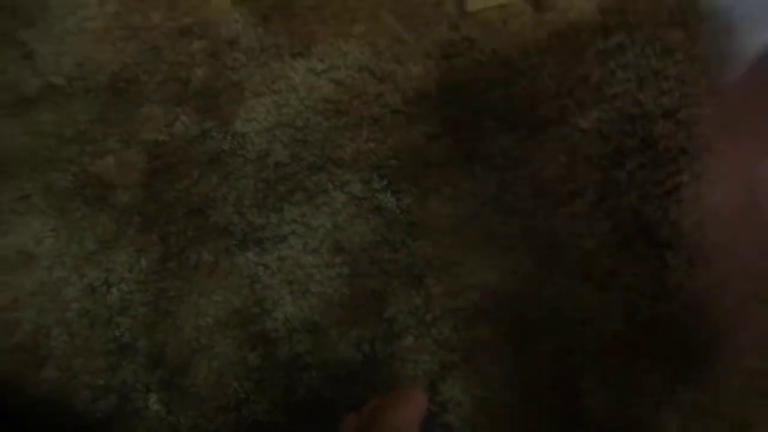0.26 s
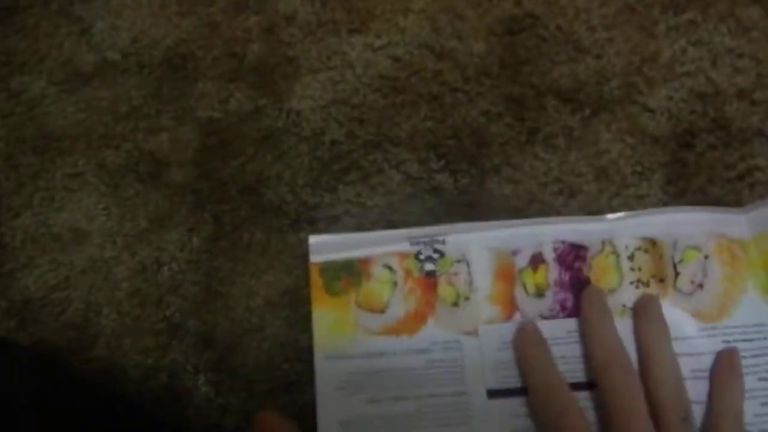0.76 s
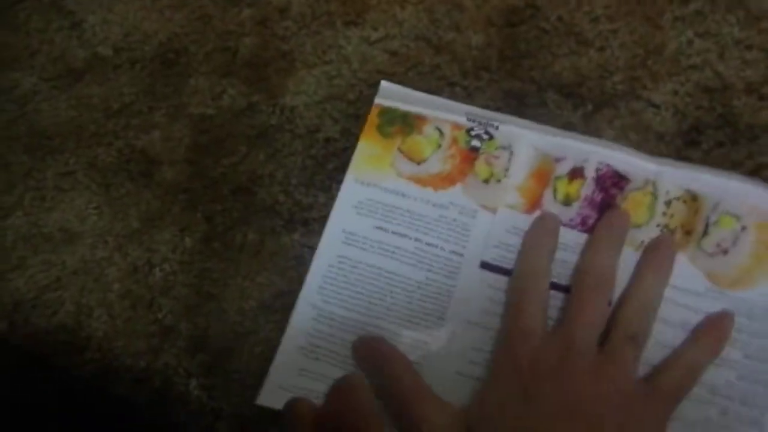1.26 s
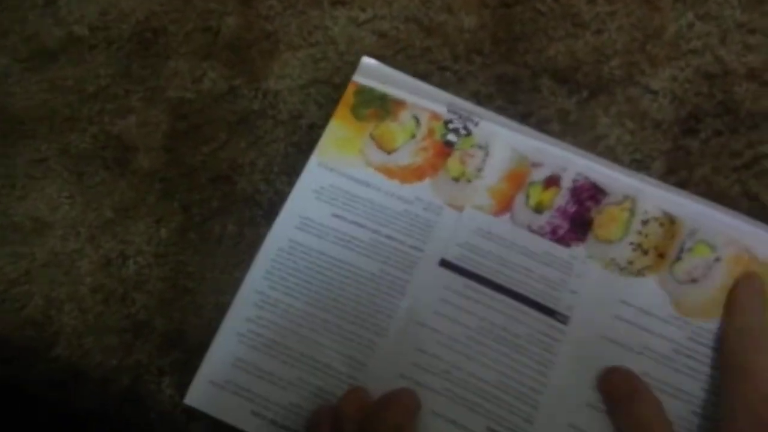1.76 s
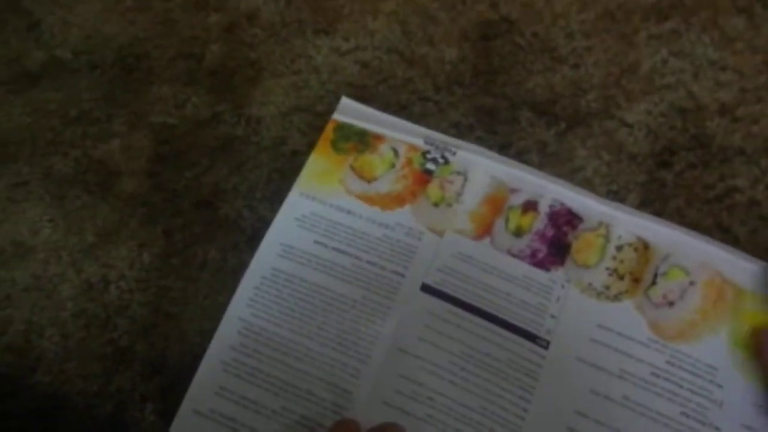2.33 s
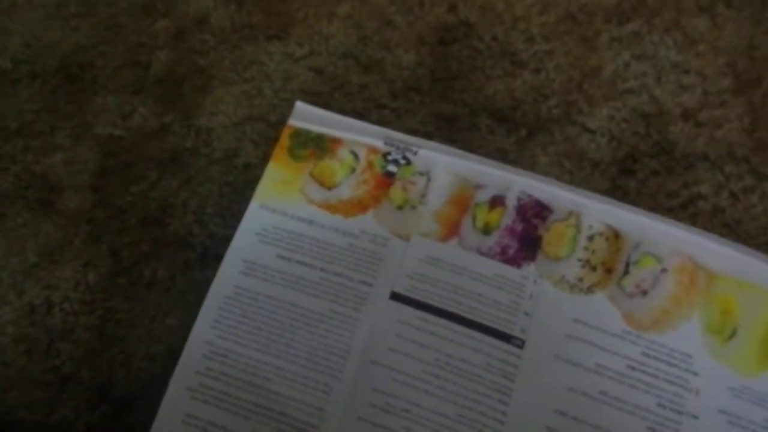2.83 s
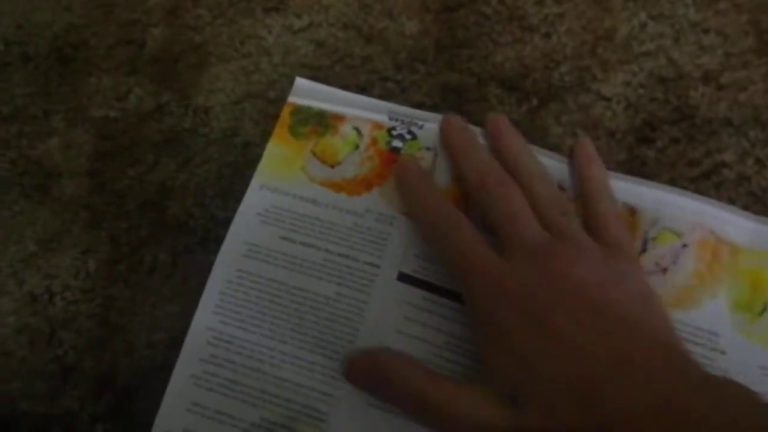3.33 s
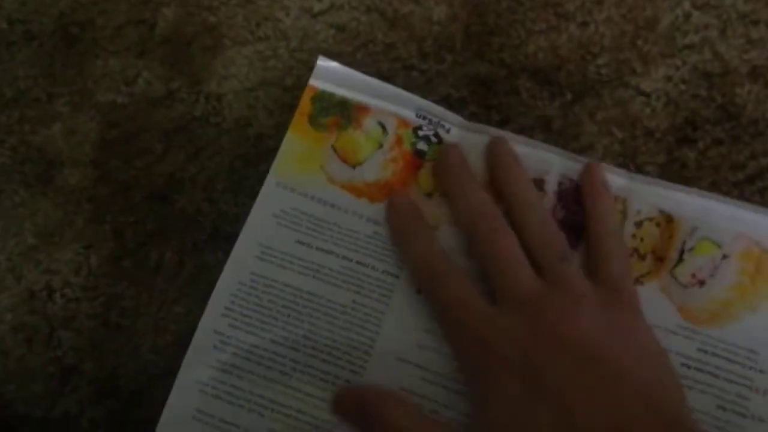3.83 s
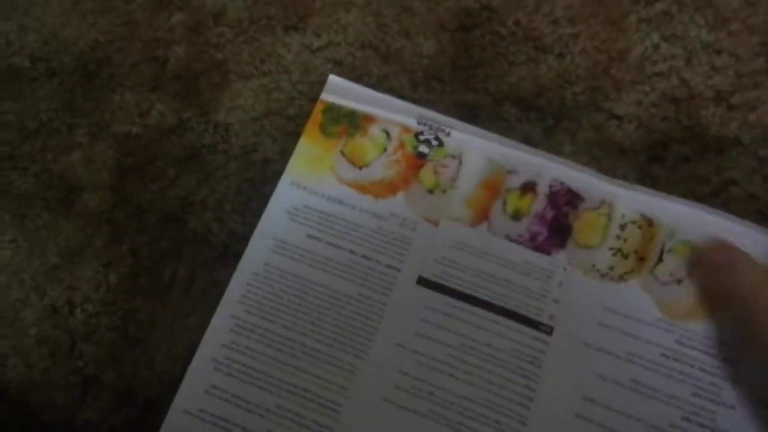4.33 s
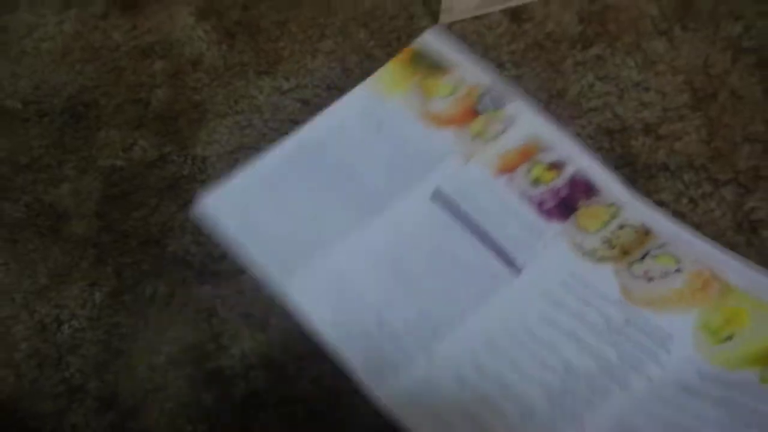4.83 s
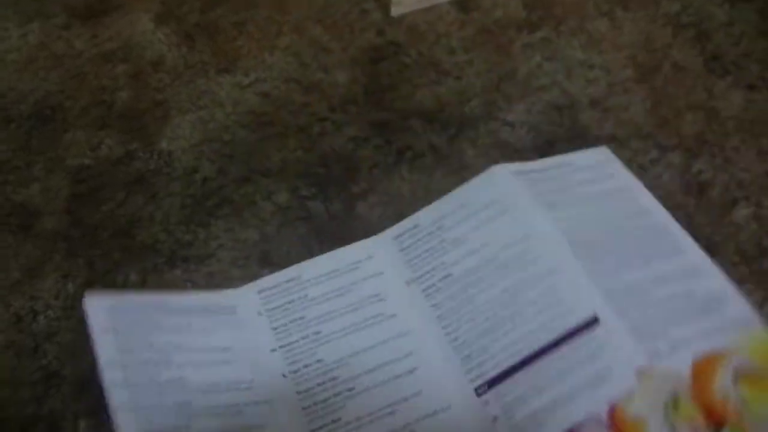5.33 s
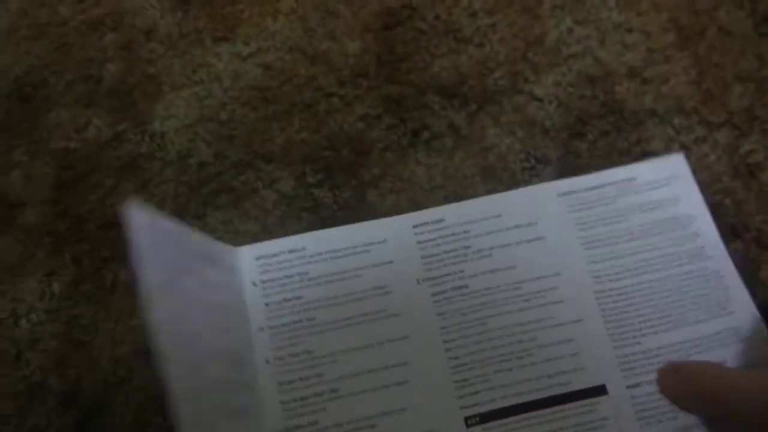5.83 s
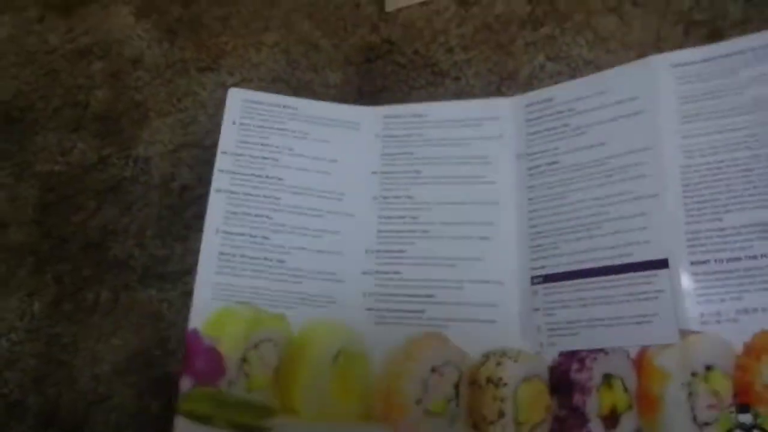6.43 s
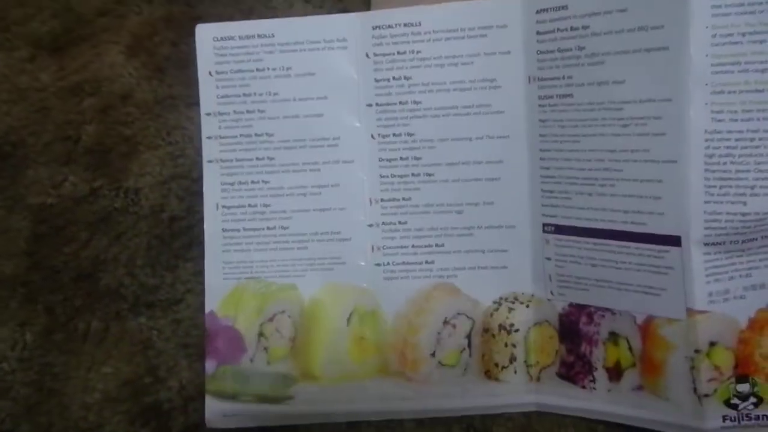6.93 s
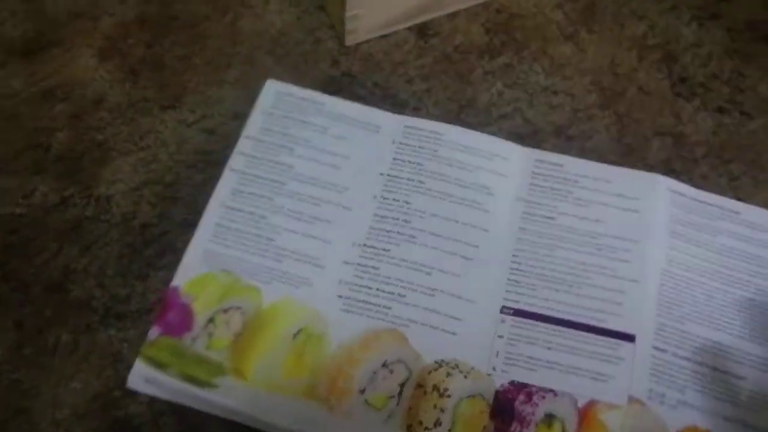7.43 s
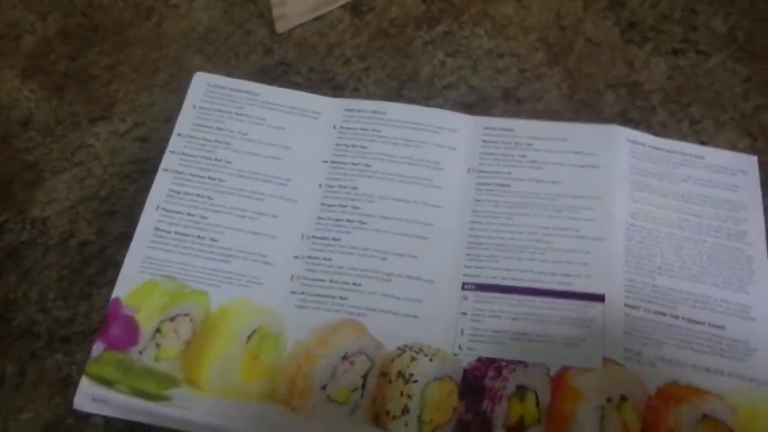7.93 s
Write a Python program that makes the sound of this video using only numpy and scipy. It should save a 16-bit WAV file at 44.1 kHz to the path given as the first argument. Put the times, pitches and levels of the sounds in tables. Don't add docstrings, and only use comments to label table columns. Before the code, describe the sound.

In a quiet, carpeted room with a faint low hum, a folded paper leaflet lands at once with a soft thud and dull, strong snaps. A brief lull holds faint rustle until 0.4 s, then panels flap and crinkle, with a heavy snap at 0.7 s. From 0.8 to 1.4 s a hand drags the sheet in a broad hissing crackle. Softer sliding follows, with sharp cracks near 2.1 s and a dense crackling cluster at 2.4-3.0 s. After a pause, creases snap at 3.4-3.8 s with a low soft thud, then a smooth slide around 3.9 s. Crisp crackling returns at 4.5-4.9 s, flapping and scraping at 5.2-5.7 s, and bright pops and hollow puffs at 5.9-6.3 s. A last snap comes at 6.6 s; weak rustles around 7.2 s and tiny left-leaning plastic ticks trail into hum by 8 s. Close stereo, short dry echoes.

```python
import sys
import numpy as np
from scipy import signal
from scipy.fft import rfft, irfft, next_fast_len
from scipy.io import wavfile
from scipy.ndimage import uniform_filter1d, map_coordinates

SR = 44100
rng = np.random.default_rng(int(sys.argv[2]) if len(sys.argv) > 2 else 0)


def boost(x):
    u = np.asarray(x, float) / 20
    return 10 ** u


def generate_wav(signal):
    frames = np.transpose(np.atleast_2d(signal))
    scaled = np.clip(frames, -1, 1) * 32767
    pcm = np.round(scaled).astype(np.int16)
    wavfile.write(sys.argv[1], SR, pcm)


N = 360297


def unit(x):
    return x / np.sqrt(np.mean(x ** 2) + 1e-20)


def along(points, hz):
    f, v = np.transpose(points)
    return np.interp(np.log(hz + 1), np.log(f + 1), v)


def wobble(rate_hz):
    knots = rng.standard_normal(int(N * rate_hz / SR) + 4)
    return map_coordinates(knots, [np.arange(N) * rate_hz / SR])


def coloured(x, points):
    m = next_fast_len(N + 8192)
    gain = boost(along(points, np.fft.rfftfreq(m, 1 / SR)))
    return irfft(rfft(x, m) * gain, m)[..., :N]


def ring(hz, t60, rise, t):
    return np.sin(2 * np.pi * hz * t) * boost(-60 * t / t60) * (1 - np.exp(-t / rise))


def place(out, start_s, sound):
    start = round(start_s * SR)
    out[..., start:start + sound.shape[-1]] += sound


def rustle(spectrum, side, lumps_db, patchy_db):
    noise = rng.standard_normal((2, N)) * boost(lumps_db)
    z = signal.stft(noise, nperseg=256)[2]
    field = uniform_filter1d(rng.standard_normal(z.shape[1:]), size=6, axis=0)
    field = uniform_filter1d(field, size=9, axis=1)
    patched = signal.istft(z * boost(patchy_db * unit(field)), nperseg=256)[1][:, :N]
    mid, other = coloured(patched, spectrum)
    other = coloured(other, side)
    return unit(np.array([mid + other, mid - other]))


def strokes(rows):
    t, power = np.arange(N) / SR, np.zeros(N)
    for s, db, rise, fall, *hold in rows:
        rising_db = 20 * np.maximum((s - t) / rise, 0)
        falling_db = 20 * np.maximum((t - s - sum(hold)) / fall, 0)
        power += boost(2 * (db - rising_db - falling_db))
    return power


# (rise, fall: 20 dB)
SLIDES = [(.46, -45.5, .04, 0.04, 0.092), (.645, -50, 0.028, .1, 0.077), (.8, -36, 0.078, 0.37, 0.2),
          (1.17, -38.5, 0.18, 0.1, .22), (1.47, -57.5, 0.055, 0.042, 0.091),
          (1.68, -51.5, 0.061, 0.17, 0.12), (1.88, -43.5, 0.43, 0.3, 0.24), (2.49, -43, 0.025, 0.089, 0.26),
          (3.35, -50.5, 0.02, 0.175, 0.04), (3.46, -43, 0.059, 0.057, 0.11),
          (3.9, -39.5, 0.17, 0.21, 0.032), (4.3, -57, 0.03, 0.24, 0.11), (4.6, -46.5, 0.16, .07, 0.1),
          (5.41, -56.5, 0.42, .1, 0.16), (5.96, -52.5, 0.12, .1, 0.11), (6.33, -50.5, 0.037, .1, 0.13),
          (6.487, -50.5, 0.22, 0.13, 0.098), (7.089, -53, 0.098, 0.18, 0.097), (7.28, -59, .02, 0.16, 0.16)]
# peak_s, level_db, rise_s, fall_s
BRUSHES = [(.01, -53.5, 0.025, 0.079), (.114, -63.5, 0.12, 0.24), (.275, -59.5, 0.059, 0.16),
           (.515, -58, 0.063, .07), (.708, -45, 0.087, 0.12), (2.355, -50, 0.067, 0.11),
           (2.604, -34.5, 0.08, 0.043), (2.88, -43.5, 0.033, 0.062), (2.961, -35.5, 0.032, 0.045),
           (3.64, -44, 0.091, 0.035), (3.79, -45, 0.037, 0.25), (4.1, -51, 0.55, 0.064),
           (4.5, -55, 0.25, .1), (4.88, -50.5, 0.098, 0.039), (5.06, -54.5, 0.53, 0.34),
           (5.228, -52, 0.049, .07), (5.29, -36.5, 0.045, 0.024), (5.572, -44.5, 0.028, 0.29),
           (5.835, -43, 0.1, 0.098), (6.175, -39.5, 0.091, 0.048), (6.292, -43.5, 0.056, 0.03),
           (6.75, -63.5, 0.22, 0.35), (7.75, -69.5, 0.52, 0.84), (8.1, -66, 0.12, .5)]
# peak_s, level_db, rise_s, fall_s
CRUMPLES = [(.072, -39, 0.077, 0.076), (.275, -61, 0.11, .14), (.465, -32.5, 0.035, 0.18),
            (.708, -25, 0.039, 0.066), (.912, -27.5, 0.24, 0.13), (1.53, -42.5, 0.14, 0.077),
            (1.732, -38, 0.099, 0.15), (2.073, -32, 0.12, 0.1), (2.352, -24, 0.02, 0.016),
            (2.55, -30.5, 0.082, 0.23), (2.77, -35, 0.25, 0.061), (2.922, -28, 0.085, 0.043),
            (3.35, -33.5, 0.0072, 0.69), (3.55, -33, 0.21, 0.13), (4.4, -49.5, 0.45, 0.46),
            (4.548, -32, 0.045, 0.056), (4.63, -27.5, 0.029, 0.11), (4.745, -29.5, 0.26, 0.13),
            (4.865, -41.5, .016, 0.19), (5.228, -32, 0.028, 0.18), (5.41, -42, 0.11, 0.089),
            (5.539, -59.5, .08, .3), (5.655, -37.5, 0.12, 0.07), (5.86, -49, 0.16, .3),
            (6.01, -29, 0.41, 0.22), (6.16, -28, 0.13, 0.033), (6.443, -34.5, 0.12, 0.062),
            (6.57, -36, 0.04, 0.22), (7.13, -39.5, 0.16, 0.36)]
# peak_s, level_db, rise_s, fall_s
FLEXES = [(.075, -30, 0.06, 0.11), (.385, -49.5, 0.3, 0.071), (.517, -27, 0.086, 0.07),
          (.68, -30.5, 0.058, 0.14), (.912, -39, 0.11, 0.17), (1.465, -49.5, .45, 0.061),
          (1.732, -37.5, 0.091, 0.13), (2.078, -34.5, 0.12, 0.17), (2.37, -41, 0.034, 0.029),
          (2.492, -30, 0.02, 0.078), (2.606, -33.5, 0.074, 0.14), (2.971, -34, 0.027, 0.039),
          (3.388, -34, 0.059, 0.064), (3.566, -45, 0.18, 0.06), (3.64, -31.5, 0.029, 0.026),
          (3.787, -29, 0.018, 0.071), (4.5, -42, 0.053, 0.15), (4.775, -30, 0.04, 0.086),
          (5.14, -43.5, 0.17, 0.051), (5.25, -34.5, 0.1, 0.13), (5.579, -39, 0.035, 0.078),
          (5.835, -45, 0.12, 0.18), (5.944, -32, 0.019, 0.061), (6.215, -34.5, 0.22, 0.11),
          (6.443, -44.5, 0.99, 0.084), (6.617, -37.5, 0.053, 0.081), (7.186, -52, 0.37, 0.08),
          (7.315, -51, 0.1, 0.072)]


def motion():
    rest_db = -80
    drag = strokes(SLIDES + BRUSHES) + boost(2 * rest_db)
    wrinkle = strokes(CRUMPLES)
    bend = strokes(FLEXES)
    flap = bend + boost(2 * -17) * drag
    crinkle = wrinkle + boost(2 * 7) * drag + boost(2 * -14) * bend
    hiss = drag + boost(2 * -21.5) * wrinkle
    return 10 * np.log10(np.array([flap, crinkle, hiss]) + 1e-9)


# freq_hz, density_db (per Hz)
FLAP = [(29, -44), (50, -10.5), (160, -5.5), (260, -10.5), (371, 2), (495, -3), (600, -3.5), (900, -6.5),
        (1900, -16), (3500, -52)]
# freq_hz, density_db (per Hz)
CRINKLE = [(350, -40), (700, -7.5), (1000, -3.5), (1450, -4.5), (2660, 0), (4500, -7), (6000, -17.5),
           (9000, -28)]
# freq_hz, density_db (per Hz)
HISS = [(2650, -7), (4500, -2), (7140, -4.5), (10400, -6.5), (15200, -13.5), (16000, -29)]
# freq_hz, side_minus_mid_db
NEAR_SIDE = [(60, -9), (400, -15.5), (1500, -20.5), (3500, -12.5), (7000, -5.5), (15000, -4.5)]


def sheet():
    flap_db, crinkle_db, hiss_db = motion()
    uneven = np.clip(-0.1 + (flap_db - hiss_db) / 18, 0.25, 1.3)
    clumps = uneven * 4 * np.tanh(0.33 * wobble(45) + 0.5 * wobble(110))
    slips = uneven * np.clip(wobble(330) - 1.3, 0, 1)
    flap_lumps = 0.59 * clumps + 3.2 * np.tanh(wobble(60)) + 5 * slips
    crinkle_lumps = 2.5 * clumps + 1.1 * wobble(160) + 9 * slips
    hiss_lumps = 1.3 * clumps + 0.54 * wobble(120) + 8 * slips
    flap = rustle(FLAP, NEAR_SIDE, flap_lumps, patchy_db=3.0)
    crinkle = rustle(CRINKLE, NEAR_SIDE, crinkle_lumps, patchy_db=2.0)
    hiss = rustle(HISS, NEAR_SIDE, hiss_lumps, patchy_db=1.4)
    return boost(flap_db + 1.5) * flap + boost(crinkle_db - 4.5) * crinkle + boost(hiss_db + 4) * hiss


# start_s, peak_db, pitch_hz, length_ms
BUCKLES = [(0.066, -6, 640, 2.1), (0.076, -25, 674, 7.1), (0.0814, -19, 720, 1.1),
           (0.0904, -15.5, 760, 6.2), (0.387, -24, 456, 3.3), (0.4956, -8, 870, 7.6),
           (0.5111, -11.5, 1070, 3.6), (0.5308, -21, 1020, 1.5), (0.6996, -17, 840, 4.6),
           (.7041, -1.1, 930, 2.1), (1.462, -26.5, 970, 5.4), (1.6775, -22.5, 800, 4.5),
           (1.6815, -22, 900, 4), (1.704, -25, 800, 8), (2.0379, -25, 1200, 1.1), (2.652, -23, 664, 2.3),
           (2.859, -27, 3450, 3.6), (3.373, -24, 1020, 5.5), (3.411, -18.5, 590, 2.6),
           (5.0683, -28, 680, 3.7), (5.5848, -26, 660, 2.4), (6.6141, -16, 820, 5.9),
           (7.1718, -25, 865, 1.7)]
# start_s, peak_db, pitch_hz, length_ms
SNAPS = [(0.0695, -2, 705, 0.77), (0.4637, -21.5, 895, 10), (0.5198, -7.5, 920, 6), (.6658, -16, 680, 5),
         (0.8926, -17, 956, 1.9), (.92, -12, 1980, 3), (1.4018, -5, 3700, 0.45), (1.7395, -19.5, 945, 4.9),
         (1.747, -19, 1430, .67), (2.112, -24, 850, 1.9), (2.2149, -15.5, 1120, 3),
         (2.486, -17.5, 1050, 1.6), (2.489, -10, 1100, 4), (2.6277, -13, 1250, .8),
         (2.965, -11.5, 2660, 2.4), (3.7782, -15, 1020, 6.4), (3.969, -23.5, 797, 4.5),
         (4.7093, -13.5, 1520, 2.4), (4.7707, -7, 1410, 3.1), (4.8, -12.5, 1490, 4.4),
         (4.804, -12.5, 850, 1.1), (5.272, -25, 2550, 14), (5.5743, -27, 1190, 2.4),
         (5.9325, -12, 1250, 1.2), (5.9475, -10.5, 2480, 3), (6.2024, -11.5, 713, 2.5),
         (6.6087, -17, 1300, 1.8)]
# start_s, peak_db,
# pitch_hz, length_ms
CRACKS = [(0.024, -23.5, 1000, 3.5), (0.3152, -33, 1210, 3.5), (0.657, -16.5, 980, 1.4),
          (1.795, -26, 1500, 20), (7.278, -36, 2300, 5), (2.137, -4.5, 1270, 2), (2.4787, -21.5, 1500, 4.9),
          (2.538, -21, 1710, 2.1), (2.591, -13, 780, 3.3), (2.6204, -10, 3100, 0.86),
          (2.892, -24, 2620, 26), (2.9735, -12.5, 2170, 0.87), (3.3937, -4.5, 885, 1.6),
          (3.6388, -5, 1360, 1.7), (3.6859, -21.5, 990, 1.4), (3.785, -9.5, 1020, 1.7),
          (3.9826, -24, 540, 3.8), (4.4865, -29, 1260, 1.6), (4.549, -27.5, 3480, 4.8),
          (4.5885, -19, 1960, 2.4), (4.7837, -6, 1770, 0.59), (5.236, -21.5, 1470, 6.4),
          (5.5676, -16, 1440, 2.2), (5.6578, -31, 3280, 8), (6.2857, -30, 890, 16), (6.988, -38, 440, 1.5),
          (8.062, -39.5, 930, 6.2)]
CRACK_DB = (-21.5, -6.5, 0.5)
# freq_hz, gain_db
EDGE = [(800, -90), (1700, -7.5), (3200, 3), (4600, -2), (6000, -9), (9000, -16.5), (15500, -30.5)]


def snaps():
    out, t = np.zeros((2, N + SR)), np.arange(-264, 1784) / SR
    f, after = np.fft.rfftfreq(len(t), 1 / SR), np.maximum(t, 0)
    kinds = zip((BUCKLES, SNAPS, CRACKS), CRACK_DB)
    creases = [(*row, crack_db) for kind, crack_db in kinds for row in kind]
    for s, db, hz, ms, crack_db in creases:
        fade_db = np.where(t < 0, -7 + 15 * t / (ms / 1000), -9 * t / (ms / 1000))
        slips = rng.standard_normal((2, len(t))) * boost(fade_db)
        slips += 5 / ms ** 0.62 * np.exp(-(14 * hz * t) ** 2)
        width = 1.02 * hz
        panel = (1j * f * width / (hz * hz - f * f + 1j * f * width)) ** 2
        edge = boost(along(EDGE, f * (1500 / hz) ** 0.18))
        side_edge = edge * boost(along(NEAR_SIDE, f))
        body, crack, stray = irfft(rfft(slips[[0, 0, 1]]) * [panel, edge, side_edge])
        body = body / np.abs(body).max()
        crack = boost(crack_db) * (crack + stray * [[1], [-1]]) / np.abs(crack).max()
        camera_ring_db = -8.5 - 0.2237 * (db + 19.5) - 5.5 * np.log2(hz / 1000)
        camera_ring = boost(camera_ring_db) * ring(400, 0.044, 0.0029, after)
        place(out, s + t[0], boost(db) * (body + camera_ring + crack))
    return out[:, :N]


# peak_s, peak_db, pitch_hz
POPS = [(0.0253, -23, 2540), (0.073, -19, 2400), (0.5954, -37, 860), (0.6018, -37, 1040), (0.661, -26, 800),
        (0.6665, -27, 2280), (0.7263, -21, 1400), (0.794, -33, 1290), (0.9469, -22, 710),
        (1.0656, -25, 3970), (1.215, -31, 940), (1.4094, -28, 830), (1.6619, -27.5, 2600),
        (1.726, -28, 2770), (1.747, -27, 1920), (1.7994, -26, 1300), (1.9593, -28.5, 810),
        (2.0611, -29, 2240), (2.082, -23, 800), (2.098, -22, 990), (2.1052, -27, 760), (2.1196, -33, 960),
        (2.2621, -32, 3060), (2.4854, -24, 2340), (2.5136, -31, 1010), (2.5909, -12, 3500),
        (2.6211, -20, 710), (2.6275, -13, 3280), (2.6494, -25, 1290), (2.871, -27, 1800),
        (2.8855, -32, 880), (2.9917, -28, 930), (3.3436, -35, 3190), (3.3675, -27, 920),
        (3.4118, -25, 1870), (3.4465, -25, 1120), (3.5876, -27, 970), (3.7789, -26, 3240),
        (3.837, -28, 750), (4.4864, -34, 2410), (4.5436, -27, 1700), (4.564, -34, 1110),
        (4.6169, -29, 1800), (4.8024, -14, 2570), (4.8579, -26, 4000), (5.2406, -23, 2900),
        (5.2454, -23, 1020), (5.2922, -21.5, 1390), (5.331, -25, 710), (5.739, -30, 2670),
        (5.845, -24, 3080), (5.9149, -29, 1010), (5.9466, -9.5, 1210), (6.2075, -25, 1250),
        (6.2416, -32, 2620), (6.339, -30, 710)]
# peak_s, peak_db, pitch_hz
CRACKLES = [(.4968, -19, 860), (.512, -22, 1060), (.5324, -18, 960), (.6206, -39, 900), (.7007, -19, 2830),
            (.7088, -29, 1840), (.9205, -19, 900), (.9253, -25, 710), (.9948, -27, 970), (1.7351, -19, 900),
            (1.7325, -25, 900), (1.669, -30, 700), (2.862, -31, 980), (3.5128, -27.5, 960),
            (3.6279, -35, 1000), (3.7712, -31, 2110), (4.5453, -25, 4300), (4.6194, -27, 2290),
            (4.6763, -27, 3010), (4.7172, -27, 2730), (4.7746, -13, 980), (4.7802, -15, 870),
            (5.2794, -24, 840), (5.7389, -37, 710), (6.0498, -26, 2170), (6.1992, -28, 4300),
            (6.2035, -18.5, 1800), (6.224, -26, 600), (6.6098, -14.5, 1980), (6.62, -25, 805),
            (0.0698, -14.5, 2180), (.0818, -22, 1100), (.091, -19, 1500), (7.1741, -31, 860)]
# peak_s, peak_db, pitch_hz
PUFFS = [(0.1577, -35, 640), (0.3615, -33, 403), (0.9264, -28.5, 476), (0.9473, -33, 390),
         (0.9966, -30, 380), (1.8012, -33, 375), (2.2238, -23, 424), (2.3677, -27, 368), (2.5922, -18, 625),
         (2.6517, -26, 440), (2.8715, -38, 423), (3.3699, -32, 410), (3.7883, -25, 407), (4.0498, -43, 380),
         (4.5076, -35, 388), (4.7853, -15, 610), (5.0471, -37, 360), (5.1527, -34, 437), (5.191, -34, 520),
         (5.2045, -30, 380), (5.2604, -23, 660), (5.3315, -26, 690), (5.3556, -37, 420), (5.588, -35, 390),
         (5.7399, -38, 400), (5.9549, -26.5, 416), (6.0832, -41, 400), (6.204, -14.5, 567),
         (6.3399, -31, 570), (6.4541, -37.5, 370), (7.3193, -36.5, 362)]
# peak_s, peak_db, pitch_hz, length_ms
TWANGS = [(2.0138, -20, 470, 2), (1.9958, -25, 650, 2), (.377, -30, 478, 4.9), (.47, -28, 4100, 2.1),
          (2.9653, -19, 9550, .8), (2.9657, -23, 7250, 1.2), (2.9752, -5.5, 2470, .8),
          (2.9735, -19, 1010, 1.8), (2.98, -27.5, 420, 6.8), (6.235, -34, 515, 8),
          (3.378, -20.5, 1050, 5.5), (4.59, -27, 700, 2.2), (4.592, -23, 4040, 1.5),
          (4.643, -24, 4840, 1.6), (4.651, -26, 4900, 1.4), (4.772, -9.5, 2700, 0.94),
          (5.07, -24.5, 763, 2.4), (5.9491, -5.5, 2990, 1.05), (5.9506, -17, 1300, 1.9),
          (6.611, -18.5, 794, 1.9)]


def pops():
    out, t = np.zeros(N + SR), np.arange(-500, 1200) / SR
    click = -boost(-5) * np.gradient(np.exp(-(t / 0.0001) ** 2)) * 5
    rows = []
    for s, db, hz in POPS + CRACKLES:
        pop_ms = max(0.87 - 0.15 * np.log2(hz / 1000), 0.3)
        rows.append((s, db - 1, hz, pop_ms, click))
    for s, db, hz in PUFFS:
        puff_ms = 4.7 * (400 / hz) ** 1.4
        rows.append((s, db - 2, hz, puff_ms, 0))
    rows += [(*row, 0) for row in TWANGS]
    for s, db, hz, ms, edge in rows:
        length_ms = np.where(t < 0, 0.7 * ms, ms)
        swell = np.exp(-(1000 * t / length_ms) ** 2)
        place(out, s + t[0], boost(db) * (swell * np.sin(2 * np.pi * hz * t) + edge))
    return out[:N]


# peak_s, peak_db
FLICKS = [(0.0244, -36.5), (0.5194, -29.5), (0.658, -29.5), (1.7469, -35.5), (2.4858, -32), (2.6213, -24),
          (2.9657, -16), (3.6391, -26), (4.5898, -35.5), (4.7714, -33), (5.2821, -30.5), (5.568, -30),
          (5.9485, -27), (6.4728, -37)]


def flicks():
    out, t = np.zeros((2, N + SR)), np.arange(-200, 300) / SR
    length_ms = 0.8
    for s, db in FLICKS:
        grit = np.diff(rng.standard_normal((2, len(t) + 3)))
        mid, side = unit(grit[:, 2:] - grit[:, :-2])
        spit = (mid + 0.45 * side * [[1], [-1]]) * np.exp(-(1000 * t / length_ms) ** 2)
        place(out, s + t[0], boost(db - 5.5) * spit)
    return out[:, :N]


# start_s, peak_db, pitch_hz
THUDS = [
    (0.024, -26, 170),
    (0.652, -33.5, 196),
    (3.633, -25, 124),
    (3.792, -37, 112),
]


def thuds():
    out, t = np.zeros((2, N + SR)), np.arange(SR // 10) / SR
    for s, db, hz in THUDS:
        place(out, s, boost(db + 12.5) * ring(hz, 0.027, 0.0034, t))
    return out[:, :N]


# start_s, peak_db
TICKS = [(6.4812, -35), (6.6706, -43), (6.739, -39), (6.7643, -40.5), (6.8125, -40), (6.887, -41),
         (7.421, -42), (7.4743, -39.5), (7.723, -37), (7.9113, -39), (8.121, -40), (8.1634, -42)]


def ticks():
    out, t = np.zeros((2, N + SR)), np.arange(SR // 10) / SR
    pan_db = np.array([[5.5], [-5.5]]) / 2
    for s, db in TICKS:
        for bounce, bounce_db in enumerate((4, -3.5, -10.5)):
            hz = 1720 * 0.95 ** bounce + 560 * np.exp(-t / 0.0024)
            tick = 2.1 * ring(hz, 0.008, 0.0006, t) + 0.3 * ring(740, 0.025, 0.00088, t)
            place(out, s + 0.0067 * bounce, boost(db + bounce_db + pan_db) * tick)
    return out[:, :N]


# freq_hz, t60_s
ROOM = [(300, 0.1), (2000, 0.11), (10000, 0.048)]


def room(x):
    hz, t, z = signal.stft(rng.standard_normal((2, SR // 4)), SR, nperseg=128)
    decay = boost(-60 * t / along(ROOM, hz)[:, None])
    tail = signal.istft(z * decay, SR, nperseg=128)[1]
    tail = tail / np.linalg.norm(tail[0])
    late = np.pad(x, (130, 0))
    mid, side = signal.fftconvolve(late[None], tail, axes=1)[:, :N]
    return np.array([mid + 0.64 * side, mid - 0.47 * side])


# freq_hz, density_db (per Hz)
HUM = [(25, -9), (59, 0.5), (150, -0.5), (250, -12.5), (344, -2), (520, -7.5), (1100, -12.5), (2300, -16.5),
       (3300, -24), (5730, -37), (10100, -45), (16000, -44.5)]
# freq_hz, side_minus_mid_db
FAR_SIDE = [(60, -10), (600, -4), (3000, -1), (7000, 11)]


def hum():
    tone_hz = 336 + 6 * wobble(7.6)
    tone = np.sin(2 * np.pi * np.cumsum(tone_hz) / SR)
    air = rustle(HUM, FAR_SIDE, 0.5 * wobble(2.84), patchy_db=1.8)
    return boost(-53) * air + boost(-65.5 + 2.4 * wobble(4.9)) * tone


def scene():
    hits = snaps() + thuds() + ticks() + pops() + flicks()
    echoes = boost(-16) * room(hits[0])
    return sheet() + hits + echoes + hum()


def band_limit(x):
    return signal.sosfilt(signal.butter(12, 16200, fs=SR, output="sos"), x)


# freq_hz, left_minus_right_db
LEAN = [(60, 1.5), (300, .6), (2500, -0.1), (9000, -2)]


def record(dry):
    m = next_fast_len(N + 8192)
    f = np.fft.rfftfreq(m, 1 / SR)
    held = dry / (1 + np.abs(dry) ** 4) ** 0.25
    balance = boost(along(LEAN, f) / 2 * [[1], [-1]])
    bass_cut = (1j * f / (70 + 1j * f)) ** 2
    ports = balance * bass_cut * (f < 15900)
    mix = irfft(rfft(held, m) * ports, m)[:, :N]
    return band_limit(mix)


dry = scene()
out = record(dry)
generate_wav(out)
```